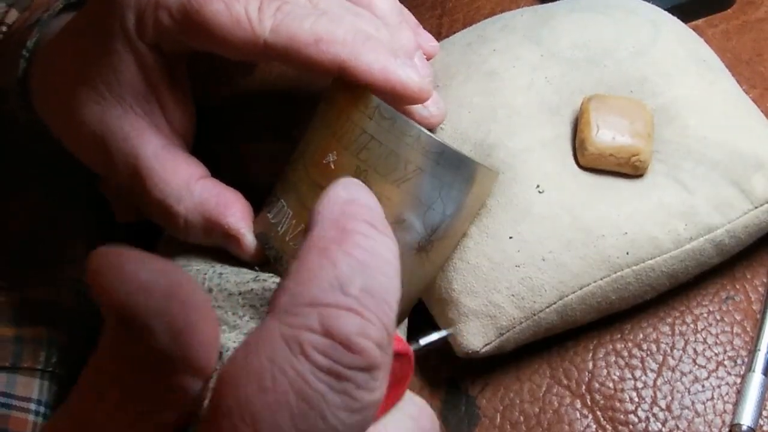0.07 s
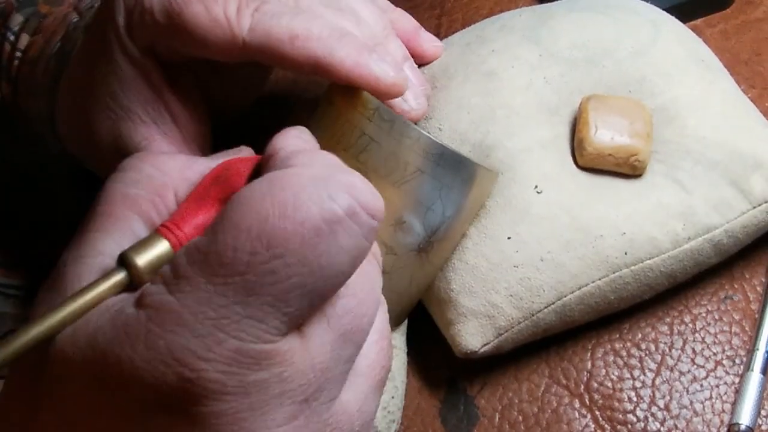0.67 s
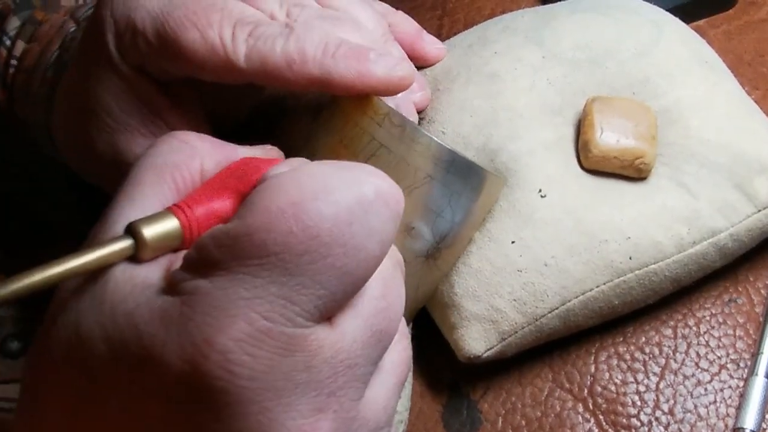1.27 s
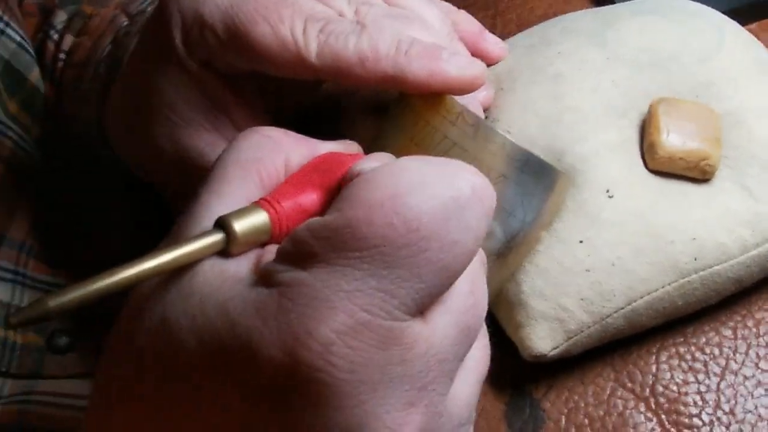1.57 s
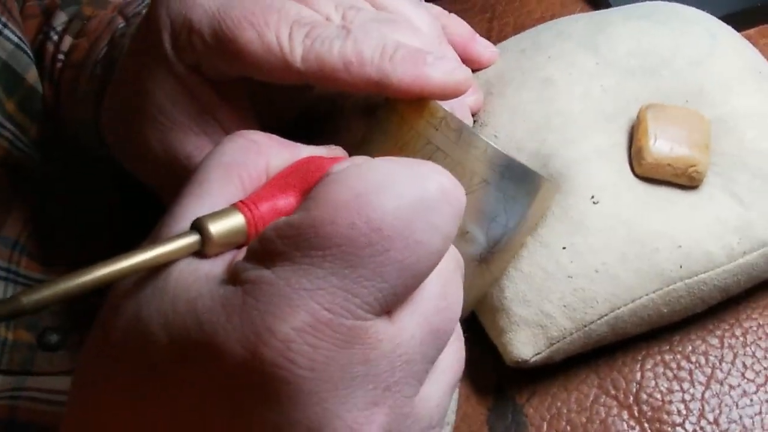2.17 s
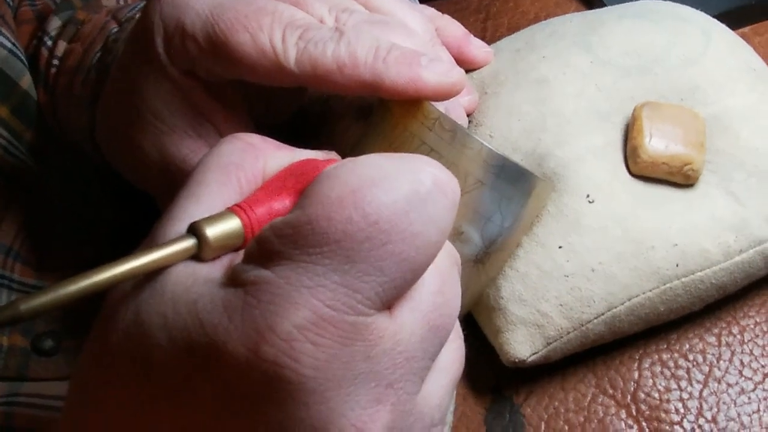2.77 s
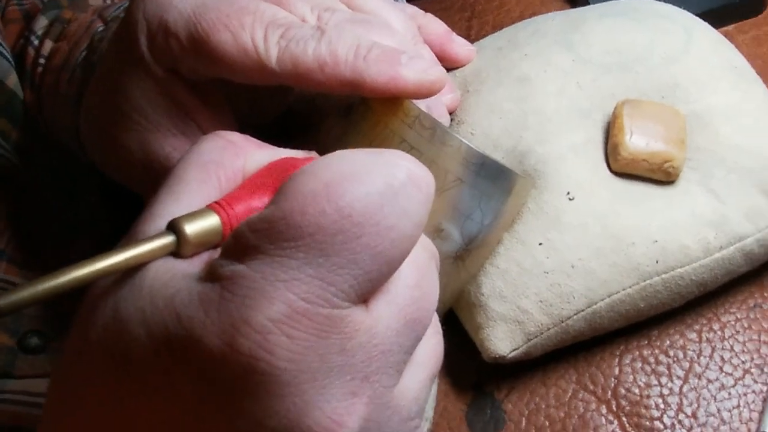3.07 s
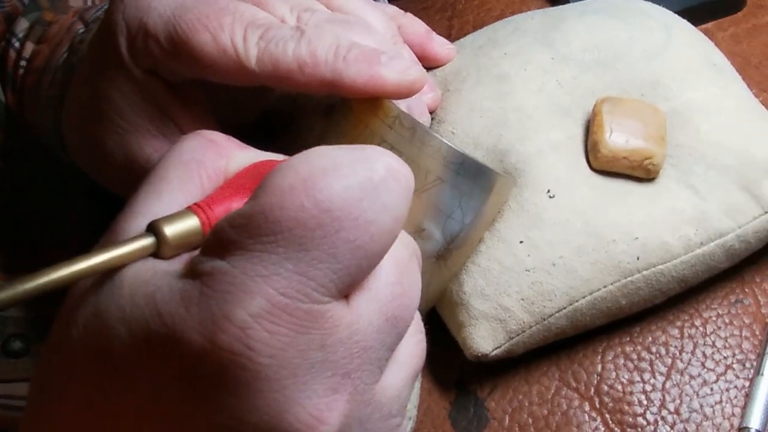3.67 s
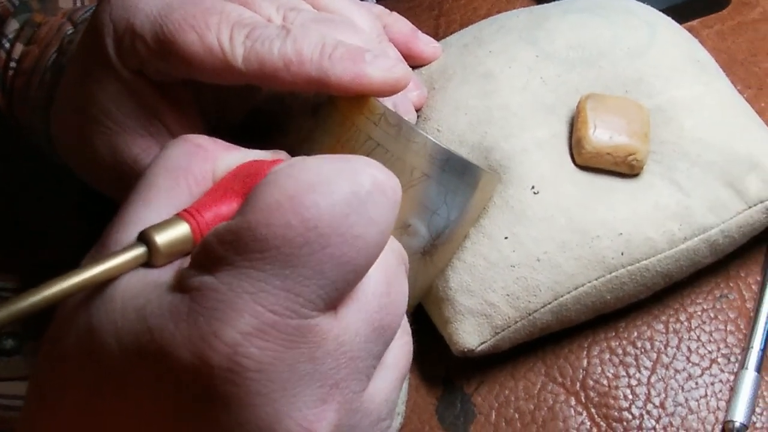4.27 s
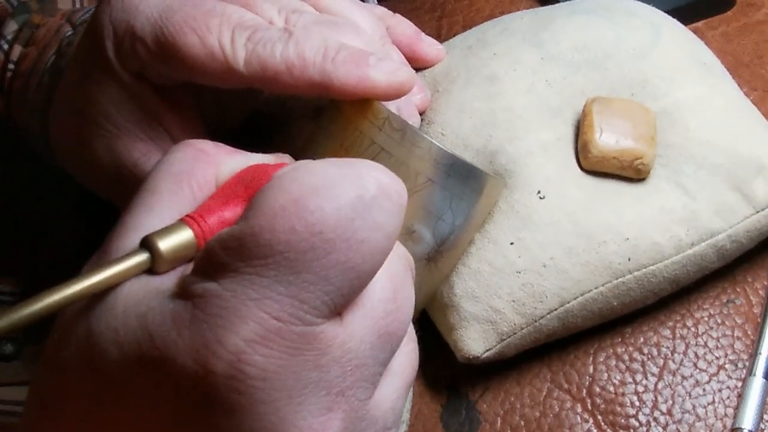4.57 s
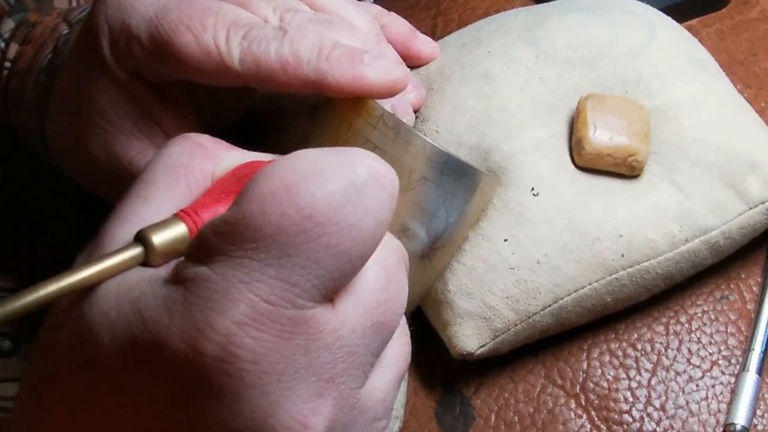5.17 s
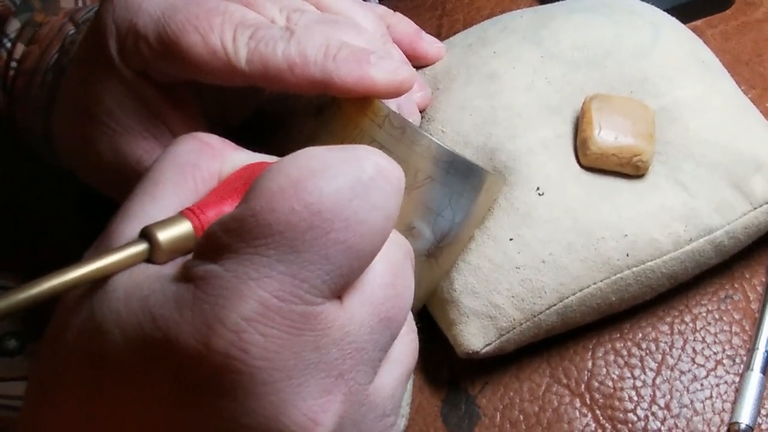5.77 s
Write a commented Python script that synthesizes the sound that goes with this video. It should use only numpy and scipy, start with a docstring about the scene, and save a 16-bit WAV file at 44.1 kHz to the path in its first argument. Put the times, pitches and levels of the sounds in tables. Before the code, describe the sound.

A flat piece of horn and a steel engraving tool are handled close by: dry clicks, soft thuds and brief scrapes, then sparse ticks.

```python
"""At a workbench in a small, quiet room, a flat piece of horn is shifted on a padded rest and a steel
graver is set against it, close by. Each impact ticks at the point and excites the damped modes of
horn and rest; stick-slip friction makes the horn rub and the point scrape. The hands bump the bench,
whose low modes thud. Later the point clicks only now and then. Mains hum and soft hiss lie beneath."""
import sys
import numpy as np
from scipy import signal
from scipy.fft import rfft, irfft, next_fast_len
from scipy.io import wavfile
from scipy.ndimage import uniform_filter1d

SR = 44100
rng = np.random.default_rng(int(sys.argv[2]) if len(sys.argv) > 2 else 0)


def transcribe(u):
    """Save the signal u as a 16-bit wav file named by the first command-line argument.

    u: samples, shape (n,) or (channels, n), limited to [-1, 1]; the rate is SR.
    q: integer samples, one column per channel.
    """
    v = np.clip(np.atleast_2d(u).T, -1, 1)
    q = np.round(v * 32767).astype(np.int16)
    wavfile.write(sys.argv[1], SR, q)


N = 265129

# Spectra of the low room noise and the hiss. Each row: frequency in Hz, relative density in dB.
AIR_SPECTRUM = [(12, -64), (20, -41), (27, -17), (43, -10), (64, 1.5), (87, -12), (197, -8.5), (235, -19.5),
                (468, -28), (559, -31.5), (680, -27), (1000, -30)]
HISS_SPECTRUM = [(700, -30), (1100, -3), (1700, 0), (2700, -.5), (4200, -3.5), (6750, 0), (8200, -14),
                 (10000, -19), (12500, -26), (19100, -85)]
# Mains hum and a faint drone. Each row: frequency in Hz, rms level in dB.
HUM_TONES = [(59.8, -64.5), (194, -68)]
# Reverberation of the room. Each row: frequency in Hz, time to fall 60 dB (T60) in seconds.
ROOM_DECAY = [(100, 0.48), (500, 0.28), (1200, 0.11), (3000, 0.2), (8000, 0.081)]
# Response of the microphone. Each row: frequency in Hz, gain in dB.
MIC_RESPONSE = [(10, -36.5), (22, -14.5), (36, 6), (60, 3.5), (6800, 1), (8200, -8), (12000, -24)]
# Low modes of the bench top, hollow modes of the padded rest on it, and modes of the flat horn.
# Each row: frequency in Hz, relative level in dB, T60 in seconds at a decay scale of 1.
BENCH_MODES = [(37.7, -16.5, 0.12), (50, -5.5, 0.14), (64.65, 9, 0.25), (83.8, 0.5, 0.15), (102.6, 3, .28),
               (138, -9.5, 0.25), (187.8, -3.5, 0.14), (277, -13, .23)]
REST_MODES = [(147.7, 0.5, 0.1), (188.8, 2.5, .18), (265.8, -7.5, 0.15), (348, -3, 0.046),
              (362.7, -4.5, 0.099), (413, -14.5, 0.26), (507, -8, 0.055), (550.6, -15.5, 0.2),
              (608.6, -10, 0.067), (659.3, -14, .13), (813, -9.5, .06)]
HORN_MODES = [(846, 9, .045), (972, 5, .02), (1050, 6, .04), (1130, 3, .042), (1231, 3.5, .055),
              (1331, 10.5, .036), (1388, 8, .027), (1460, 2, .03), (2420, -14, .07), (2640, -16, .04),
              (2960, -11, .045), (3200, -15, .05)]
# How the horn radiates ticks and grit. Each row: frequency in Hz, gain in dB.
HORN_RADIATION = [(700, -1), (1400, 11.5), (1850, -7), (2150, -3.5), (2550, -6), (3000, -7), (3900, -10),
                  (4600, -8), (5080, -4), (5600, -8.5), (6900, -1), (10000, -2.5)]
# Heavier blows of the hands. Each row: start in seconds, relative level in dB, frequency in Hz,
# cycles until the envelope peaks.
HAND_BLOWS = [(1.464, -17.5, 66.6, 1.36), (1.527, -29, 71, 1), (1.592, -24, 91.6, 0.84),
              (1.622, -22.5, 62.5, .7), (1.659, -15, 86.8, 1.03), (1.683, -21.5, 98.6, 0.8),
              (1.742, -13.5, 81.7, .65), (1.775, -23.5, 64.7, 0.95), (1.935, -29.5, 64.8, 0.5),
              (1.966, -26, 79.3, 0.73), (2.014, -22, 99.3, .9), (2.128, -24, 75, .6),
              (2.304, -28.5, 95.5, .6), (2.385, -16.5, 62, 0.72), (2.387, -12, 188, .8),
              (2.411, -15, 61.6, 0.5), (2.453, -26.5, 45.8, 0.8), (2.838, -33.5, 63.8, 0.66),
              (2.895, -23, 68.4, 0.77), (3.056, -19, 95.3, 0.65), (3.092, -32.5, 93, 0.49),
              (3.266, -39, 113, 0.51), (4.06, -40.5, 100, 0.46), (4.126, -40.5, 189, 0.58),
              (4.613, -48, 171, 0.75), (4.708, -26.5, 89.5, 0.73), (4.728, -29.5, 61, 0.87),
              (5.335, -47, 50.5, 0.72)]
# The horn shifted on its rest, and the point drawn over the horn.
# Each row: start in seconds, duration in seconds, relative effort in dB.
HORN_SHIFTS = [(1.481, 0.27, -0.5), (1.94, 0.11, -3), (2.13, 0.1, -11), (2.372, 0.025, -1),
               (2.64, 0.1, -19), (2.82, 0.084, -5), (3.05, 0.035, -7)]
POINT_DRAGS = [(1.5, .05, -5), (1.58, 0.15, -11.5), (1.965, 0.092, -3), (2.822, 0.056, -5),
               (2.9, 0.2, -13.5)]
# A tiny dry snap at the very tip. Each row: start in seconds, relative level in dB,
# centre frequency in Hz, half-width in octaves.
TIP_SNAPS = [(3.757, -36, 6600, 0.3)]
# Contacts of graver and horn. Each row: start in seconds, relative levels in dB of ring, knock and
# tick, half-width of the tick in octaves, favoured ring frequency in Hz, decay scale.
CONTACTS = [(1.4577, -38.5, -35, -48.5, 0.33, 860, 3.9), (1.4918, -13.5, -30, -21.5, 0.27, 1130, 1.3),
            (1.4979, -21.5, -47.5, -33.5, 0.31, 1054, 1.5), (1.512, -26, -37, -34.5, .35, 1060, 0.61),
            (1.531, -28.5, -34, -49.5, .4, 1030, 0.58), (1.5704, -37.5, -51.5, -44, 0.36, 1070, 1.1),
            (1.613, -48.5, -47, -39, 0.55, 1120, 1), (1.656, -38.5, -25.5, -43, 0.51, 820, 1.2),
            (1.736, -47.5, -33.5, -67, 0.34, 874, 0.89), (1.838, -46, -55.5, -72.5, 0.53, 1018, 0.79),
            (1.9195, -35.5, -57.5, -68, 0.37, 1184, 1.1), (1.9562, -36.5, -42, -32, 0.52, 1150, 2.9),
            (2.0235, -40, -31.5, -51, 0.62, 1365, 1), (2.0504, -24, -31, -38, .35, 1102, 1),
            (2.066, -32.5, -43, -37, 0.36, 1214, 1.1), (2.1225, -47, -46, -69, .4, 1370, 1.4),
            (2.23, -55.5, -43.5, -77, .4, 1260, 0.97), (2.3, -59, -42, -76, .4, 890, 0.65),
            (2.3805, -25.5, -43, -37, 0.4, 1450, 1.9), (2.383, -24, -22.5, -39, 0.45, 980, 0.62),
            (2.398, -41, -33.5, -42, .25, 1334, .5), (2.416, -20.5, -52, -56, .2, 1342, 0.88),
            (2.4515, -35, -49, -44, 0.48, 1250, 1.1), (2.5779, -39, -51.5, -34.5, 1.12, 1160, 0.72),
            (2.5816, -34, -37.5, -33, 0.43, 1247, 1.2), (2.77, -40, -58, -44.5, 0.76, 1110, .6),
            (2.8594, -40.5, -37.5, -39.5, 0.15, 1200, 1.2), (2.8902, -34, -44.5, -53, .25, 1384, 1.4),
            (3.053, -38, -38.5, -39, 0.67, 1130, 1.8), (3.096, -48, -50.5, -77, 0.56, 1120, 2),
            (3.265, -49.5, -42, -73, .4, 1300, 1.2), (4.0639, -27, -41.5, -38.5, 0.27, 1206, 1.48),
            (4.1205, -38.5, -34.5, -41, 0.33, 1260, 1), (4.611, -47.5, -37, -45.5, 0.62, 1290, 1.84),
            (4.707, -51, -39, -48.5, 0.45, 990, 0.89)]


def amp(db):
    """Amplitude ratio of a level in decibels."""
    return 10 ** (np.asarray(db) / 20)


def unit_rms(x):
    """Normalisation to an rms of 1."""
    return x / np.sqrt(np.mean(x ** 2) + 1e-20)


def unit_peak(x):
    """Normalisation to a peak of 1."""
    return x / (abs(x).max() + 1e-20)


def value_at(curve, hz):
    """Interpolation on a logarithmic frequency axis."""
    curve_hz, values = np.transpose(curve)
    return np.interp(np.log(hz + 1), np.log(curve_hz + 1), values)


def colour(x, curve):
    """Linear filtering: the spectrum is multiplied by a curve of (Hz, dB) points."""
    size = next_fast_len(len(x) + 4096)
    gain = amp(value_at(curve, np.fft.rfftfreq(size, 1 / SR)))
    return irfft(rfft(x, size) * gain, size)[:len(x)]


def add(mix, start, sound):
    """Superposition: a sound joins the mix at a start time in seconds."""
    part = mix[round(start * SR):][:len(sound)]
    part += sound[:len(part)]


def ring(modes, decay_scale=1):
    """Free vibration of damped modes; neighbours start in antiphase, so the sum takes time to build."""
    t = np.arange(0, decay_scale * max(t60 for _, _, t60 in modes), 1 / SR)
    return sum((-1) ** k * amp(db - 60 * t / (t60 * decay_scale)) * np.sin(2 * np.pi * hz * t)
               for k, (hz, db, t60) in enumerate(modes))


def tick(centre_hz, octaves, snap_s=0.0036, crumble_s=0.007, crumble_db=-15):
    """A band-limited transient of unit energy: noise snaps and crumbles away within milliseconds."""
    t, hz = np.arange(2048) / SR, np.fft.rfftfreq(2048, 1 / SR)
    band = 1 / (1 + (np.log2((hz + 1) / centre_hz) / octaves) ** 2)
    grit = unit_rms(irfft(band * np.exp(2j * np.pi * rng.random(len(hz)))))
    envelope = unit_peak(t * np.exp(-2 * t / snap_s)) + amp(crumble_db) * np.exp(-t / crumble_s)
    snap = grit * envelope
    return snap / np.linalg.norm(snap)


def background(air_db=-56, hiss_db=-68.3, waver_rad=0.24):
    """Stationary room noise and hiss, with hum tones that waver by slow phase modulation."""
    t = np.arange(N) / SR
    low_noise = signal.sosfilt(signal.butter(4, 1200, fs=SR, output="sos"), rng.standard_normal(N))
    out = amp(air_db) * unit_rms(colour(low_noise, AIR_SPECTRUM))
    out += amp(hiss_db) * unit_rms(colour(rng.standard_normal(N), HISS_SPECTRUM))
    mains_hz = HUM_TONES[0][0]
    for hz, db in HUM_TONES:
        drift = np.interp(t, np.linspace(0, t[-1], 40), rng.standard_normal(40))
        phase = 2 * np.pi * hz * t + waver_rad * drift * hz / mains_hz
        out += amp(db) * np.sqrt(2) * np.sin(phase)
    return out


def sizzle(per_s=28, level_db=-54, spread_db=3, jitter=0.24):
    """A jittered pulse train: faint, thin ticking runs unevenly through the hiss."""
    out = np.zeros(N)
    for k, (late, size) in enumerate(rng.standard_normal((int(N / SR * per_s), 2))):
        start = abs(k + jitter * late) / per_s
        add(out, start, amp(level_db + spread_db * size) * tick(centre_hz=6550, octaves=0.09))
    return out


def reverberation(x, gap_s=0.012):
    """Diffuse reflections form a short tail, each band decaying exponentially at its own rate."""
    noise = rng.standard_normal(SR // 2) * (np.arange(SR // 2) > gap_s * SR)
    hz, t, bands = signal.stft(noise, SR, nperseg=256)
    decay = amp(-60 * t / value_at(ROOM_DECAY, hz)[:, None])
    tail = signal.istft(bands * decay, SR, nperseg=256)[1]
    wet = signal.fftconvolve(x, tail / np.linalg.norm(tail))[:N]
    return colour(wet, [(100, -6.5), (400, -16.5), (1200, -20.5), (3000, -12.5), (8000, -8)])


def effort(moves, rise_s=0.016, fall_db_per_s=214):
    """Envelope of the driving force: each move rises linearly, holds and decays exponentially."""
    t = np.arange(N) / SR
    envelope = np.zeros(N)
    for start, duration, db in moves:
        rise = np.clip((t - start) / rise_s, 0, 1)
        fall_db = fall_db_per_s * np.maximum(t - start - duration, 0)
        envelope = np.maximum(envelope, rise * amp(db - fall_db))
    return envelope


def judder(per_s=50, level_db=-29, spread_db=1.5, centre_hz=83.5, cycles=0.61, jitter=0.35):
    """Irregular forcing: small pushes of the hands follow the shifting effort, in rows like HAND_BLOWS."""
    late, size, pitch = rng.uniform(-0.5, 1, (int(N / SR * per_s) - 1, 3)).T
    starts = (np.arange(len(late)) + 0.5 + jitter * late) / per_s
    effort_db = 20 * np.log10(effort(HORN_SHIFTS)[(starts * SR).astype(int)] + 1e-9)
    levels = level_db + effort_db + spread_db * size
    pitches = centre_hz * 2 ** (0.16 * pitch)
    return [(start, db, hz, cycles) for start, db, hz in zip(starts, levels, pitches) if db > -60]


def hand_bumps(boom_db=-5):
    """Forced vibration: a padded push swings briefly and drives the low modes of the bench."""
    out, t = np.zeros(N), np.arange(SR // 2) / SR
    bench = ring(BENCH_MODES)
    for start, db, hz, cycles in list(HAND_BLOWS) + judder():
        age = t * hz / cycles  # 1 at the peak of the envelope
        push = unit_peak(age ** 2 * np.exp(-2 * age) * np.sin(2 * np.pi * hz * t))
        boom = unit_peak(signal.fftconvolve(push, bench)[:len(t)])
        add(out, start, amp(db) * (push + amp(boom_db) * boom))
    return out


def rest_knock(decay_scale, spread_db=3.5):
    """Impulse response of the rest: each place of contact weights its modes a little differently."""
    modes = [(hz, db + spread_db * rng.standard_normal(), t60) for hz, db, t60 in REST_MODES]
    return unit_peak(ring(modes, decay_scale))


def horn_ring(centre_hz, decay_scale, db_per_octave=38, max_cut_db=22):
    """Selective excitation: the place of contact favours modes near one pitch; the grip damps them."""
    modes = [(hz, db - min(db_per_octave * abs(np.log2(hz / centre_hz)), max_cut_db), t60)
             for hz, db, t60 in HORN_MODES]
    return unit_peak(ring(modes, decay_scale))


def stick_slip(per_s, spread_db):
    """Stick-slip friction as a Poisson train of impulses of uneven size."""
    slips = (rng.random(N) < per_s / SR) * rng.choice([-1, 1], N)
    return slips * amp(spread_db * np.minimum(rng.exponential(1, N), 4))


def skid(offset_db=-31, firm_db=-26, growth=1.24, duration_s=0.25, fall_db_per_s=236.5):
    """Envelope of the point skidding after a tick: a power law of the tick's strength, soon decaying."""
    out, t = np.zeros(N), np.arange(0, duration_s, 1 / SR)
    for start, _, _, tick_db, *_ in CONTACTS:
        onset_db = firm_db + growth * (tick_db - firm_db) + offset_db
        add(out, start, amp(onset_db - fall_db_per_s * t))
    return out


def horn_rubbing(horn_db=-70.5, rest_db=-48, skid_db=7, decay_scale=0.25):
    """Sliding friction drives the modes of horn and rest; the skidding point adds to the horn's share."""
    slips = stick_slip(per_s=600, spread_db=3.5)
    moving = effort(HORN_SHIFTS)
    horn = unit_rms(signal.oaconvolve(slips, ring(HORN_MODES, decay_scale))[:N])
    rest = unit_rms(signal.oaconvolve(slips, ring(REST_MODES, decay_scale))[:N])
    return (amp(horn_db) * moving + amp(skid_db) * skid()) * horn + amp(rest_db) * moving * rest


def graver_scraping(grit_db=-63.5, sing_db=-53, drag_squeak_db=-9, skid_squeak_db=-20):
    """Stick-slip chatter of the steel point gives dry grit and a thin squeak, and the horn resonates."""
    slips = stick_slip(per_s=3000, spread_db=2.5)
    radiated = colour(slips, HORN_RADIATION)
    grit = unit_rms(colour(radiated, [(900, -17.5), (2700, -3.5), (4000, -6.5), (8000, -20.5)]))
    squeak = unit_rms(signal.lfilter(*signal.iirpeak(5060, Q=14, fs=SR), slips))
    sing = unit_rms(signal.oaconvolve(slips, horn_ring(centre_hz=1450, decay_scale=0.69))[:N])
    dragging = amp(grit_db) * (grit + amp(drag_squeak_db) * squeak) + amp(sing_db) * sing
    skidding = grit + amp(skid_squeak_db) * squeak
    return effort(POINT_DRAGS) * dragging + skid() * skidding


def graver_taps(ring_gain_db=1, knock_gain_db=2, tick_gain_db=16, tick_hz=2740):
    """Impact excitation: each contact ticks at the point, rings the horn and knocks on the rest."""
    rings, knocks, ticks = np.zeros((3, N))
    for start, ring_db, knock_db, tick_db, octaves, ring_hz, decay_scale in CONTACTS:
        add(rings, start, amp(ring_db + ring_gain_db) * horn_ring(ring_hz, decay_scale))
        add(knocks, start, amp(knock_db + knock_gain_db) * rest_knock(decay_scale))
        add(ticks, start, amp(tick_db + tick_gain_db) * tick(tick_hz, octaves))
    for start, db, hz, octaves in TIP_SNAPS:
        add(ticks, start, amp(db + tick_gain_db) * tick(hz, octaves))
    # the padding takes the edge off the knocks
    padded = signal.sosfilt(signal.butter(2, 1100, fs=SR, output="sos"), knocks)
    # the horn radiates little between its two groups of modes
    body = signal.lfilter(*signal.iirnotch(1830, Q=3, fs=SR), rings + padded)
    return body + colour(ticks, HORN_RADIATION)


def scene():
    """Superposition at one close microphone: contacts, their reverberation, thuds and background."""
    contacts = graver_taps() + horn_rubbing() + graver_scraping()
    handling = colour(contacts + reverberation(contacts) + hand_bumps(), MIC_RESPONSE)
    return (handling + background() + sizzle())[None]


def record(dry, threshold_db=-27, share=0.3, recovery_db_per_s=22, cutoff_hz=12700):
    """Automatic gain control ducks the sound at loud thuds and recovers slowly; a low-pass follows."""
    power_db = 10 * np.log10(abs(uniform_filter1d(dry[0] ** 2, size=600)) + 1e-12)
    recovery_db = np.arange(N) * recovery_db_per_s / SR
    held_db = np.maximum.accumulate(power_db + recovery_db) - recovery_db
    excess_db = np.maximum(held_db - threshold_db, 0)
    cut_db = share * signal.lfilter([0.001], [1, -0.999], excess_db)  # smoothed over about 23 ms
    low_pass = signal.firwin(511, cutoff_hz, window=("kaiser", 9), fs=SR)
    return signal.oaconvolve(dry / amp(cut_db), low_pass[None], "same")


dry = scene()
out = record(dry)
transcribe(out)
```